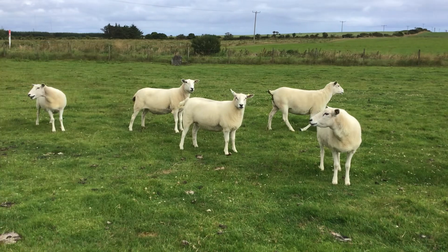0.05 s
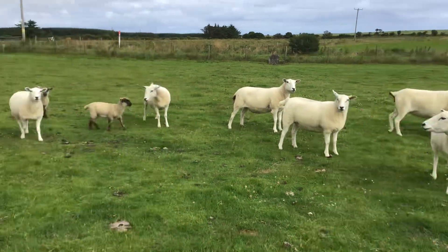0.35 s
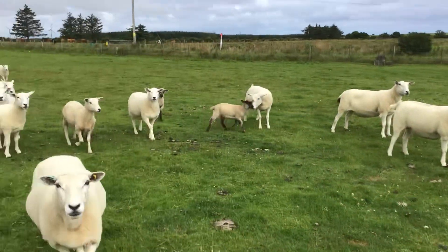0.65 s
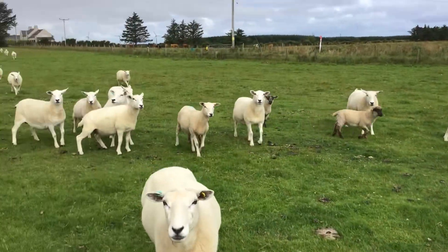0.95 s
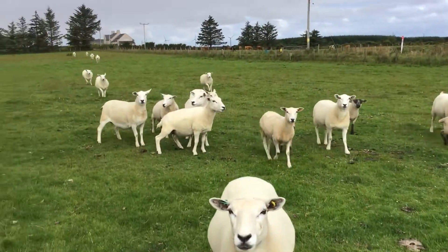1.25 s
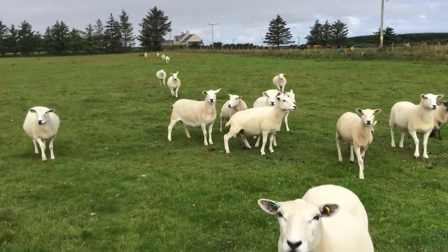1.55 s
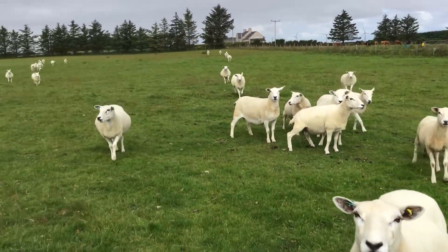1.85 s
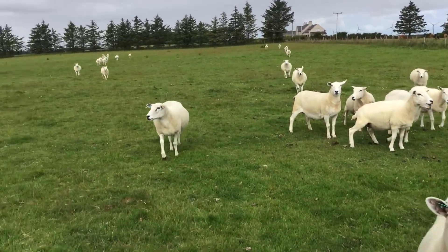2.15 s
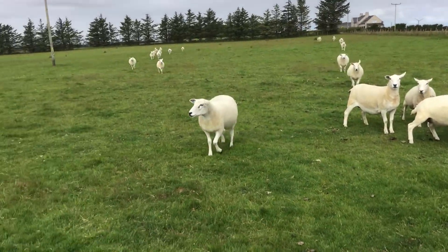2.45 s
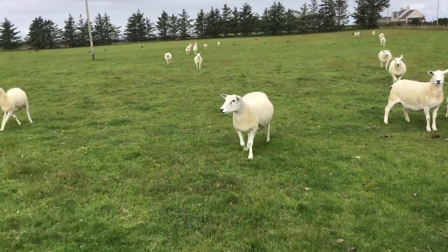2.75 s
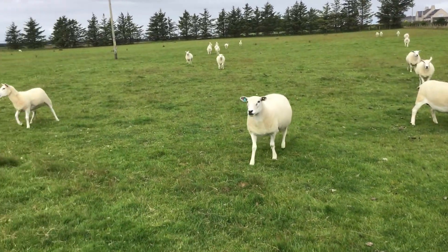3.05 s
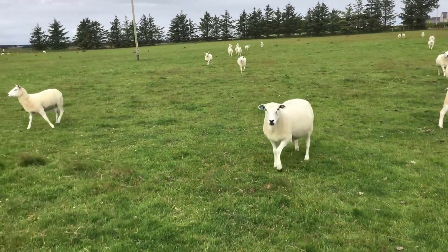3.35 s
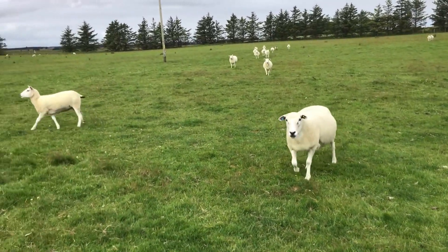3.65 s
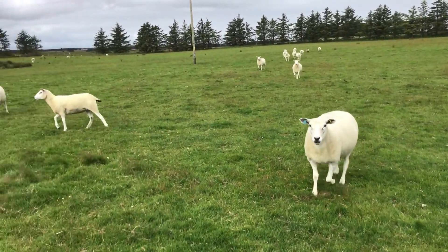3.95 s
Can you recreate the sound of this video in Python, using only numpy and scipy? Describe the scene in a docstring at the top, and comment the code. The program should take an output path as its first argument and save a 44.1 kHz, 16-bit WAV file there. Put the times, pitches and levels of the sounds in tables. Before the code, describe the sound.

Several sheep call in a field: faint bleats first, then a quavering one, a creaky stutter, a throbbing call and a low bleat. Wind bumps the microphone, building to loud, crackling gusts toward the end.

```python
"""An open pasture, where sheep bleat in turn: smooth quavering calls, a creaky stutter, a throbbing call
and a low one. Each bleat is a train of tiny puffs from the vocal folds that makes the throat ring.
Behind them the field hisses faintly and wind rumbles on the microphone. Its eddies (swirls of air) thump
with a falling pitch, and the hardest crackle. A few faint clicks are heard; a limiter holds the peaks."""
import sys
import numpy as np
from scipy import signal
from scipy.fft import rfft, irfft
from scipy.io import wavfile
from scipy.ndimage import uniform_filter1d, minimum_filter1d

SR = 44100
rng = np.random.default_rng(int(sys.argv[2]) if len(sys.argv) > 2 else 0)


def materialize(psi):
    """Save the field psi as 16-bit PCM at rate SR to the path in sys.argv[1].

    A 1-D psi becomes a single channel; in a 2-D psi each row is a channel.
    """
    bounded = np.clip(np.atleast_2d(psi).T, -1, 1)
    quanta = np.round(bounded * 32767).astype(np.int16)
    wavfile.write(sys.argv[1], SR, quanta)


N = 176400  # 4 seconds


def undb(db):
    """Turn decibels into a number to multiply by."""
    return 10 ** (np.asarray(db) / 20)


def unit(x):
    """Scale a signal to a typical size (rms) of 1."""
    return x / np.std(x)


def curve(rows, column=1):
    """One column of a table, joined by straight lines in time."""
    rows = np.array(rows)
    return np.interp(np.arange(N) / SR, rows[:, 0], rows[:, column])


def shape(x, gain_at):
    """Give each frequency its own gain, with a filter that rings only after a sound, never before."""
    hz = np.maximum(np.arange(N + 1) * SR / (2 * N), 1)
    cepstrum = irfft(np.log(gain_at(hz) + 1e-7))
    cepstrum[1:N] *= 2
    cepstrum[N + 1:] = 0
    return irfft(rfft(x, 2 * N) * np.exp(rfft(cepstrum)))[:N]


def noise(colour):
    """Noise of size 1; its colour table says how strong the low and high frequencies are."""
    hz, db = np.array(colour).T
    return unit(shape(rng.standard_normal(N), lambda f: undb(np.interp(np.log(f), np.log(hz), db))))


def wander(per_s):
    """A smooth random wobble of size 1, heading for a new value per_s times a second."""
    k = int(SR / per_s)
    steps = np.repeat(rng.standard_normal(N // k + 1), k)
    return unit(uniform_filter1d(uniform_filter1d(steps, k), k // 2)[:N])


def swell(start, rise_s):
    """A loudness shape that peaks rise_s seconds after its start and dies away."""
    age = np.maximum(np.arange(N) / SR - start, 0) / rise_s
    return age ** 2 * np.exp(2 * (1 - age))


# colour of the field's hiss (frequency [Hz], level [dB])
AIR_COLOUR = [(100, 2), (600, -6), (1200, -9), (2500, -11), (4000, -22.5), (7000, -28), (15000, -27)]

def air(level_db=-53):
    """The faint, nearly steady hiss of the open field."""
    waver = undb(1.1 * wander(14))
    return undb(level_db) * waver * noise(AIR_COLOUR)


# faint clicks, then the bright snap of the hardest wind crack (time [s], level [dB])
CLICKS = [(0.256, -38.5), (0.807, -49), (1.125, -44), (2.268, -41), (2.925, -15)]
# their bright colour (frequency [Hz], level [dB])
CLICK_COLOUR = [(500, -21), (2200, 14), (5500, 9.5), (10000, -3.5), (15000, -20)]

def clicks(rise_s=0.00053):
    """Tiny bursts of bright noise: faint clicks, plus the snap of the hardest wind crack."""
    return noise(CLICK_COLOUR) * sum(undb(db) * swell(start, rise_s) for start, db in CLICKS)


# how strong the wind is (time [s], level [dB])
GUST = [(0, -35.5), (.17, -42.5), (.26, -59.5), (.8, -49.5), (.93, -54.5), (1.05, -44), (1.3, -49),
        (1.75, -42.5), (1.92, -33), (2.04, -52.5), (2.32, -38), (2.45, -52), (2.57, -43), (2.68, -28),
        (2.88, -20.5), (3.02, -31.5), (3.24, -24), (3.3, -33.5), (3.58, -28.5), (3.68, -19), (3.77, -31),
        (3.86, -23.5), (4, -40)]
# colours of the deep rumble and the higher flutter (frequency [Hz], level [dB])
RUMBLE_COLOUR = [(20, -36.5), (38, -18), (62, 0), (100, 0.5), (160, -4), (250, -12.5), (500, -32),
                 (1000, -80.5)]
FLUTTER_COLOUR = [(60, -14), (150, -15.5), (260, 0.5), (480, -2), (800, -17.5), (1500, -36.5),
                  (3000, -52.5), (15000, -105)]

def wind(rumble_flicker_db=3.0, flutter_flicker_db=4):
    """Rough air on the microphone: rumble and flutter surge together; flutter grows faster in a gust."""
    surge, gust_db = wander(45), curve(GUST)
    rumble = unit(noise(RUMBLE_COLOUR) * undb(rumble_flicker_db * surge))
    flutter = unit(noise(FLUTTER_COLOUR) * undb(flutter_flicker_db * surge))
    return rumble * undb(0.47 * gust_db - 0.5) + flutter * undb(gust_db + 6.5)


# eddies that thump (time [s], level [dB])
THUMPS = [(0.086, -10.5), (0.126, -13.5), (0.165, -8), (0.384, -8.5), (0.533, -9.5), (0.67, -10),
          (.778, -12), (0.828, -9.5), (1.002, -7), (1.05, -10.5), (1.119, -14), (1.386, -11.5), (1.497, -6),
          (1.53, -8), (1.696, -4.5), (1.835, 1.5), (1.882, -13), (1.921, -13), (2.132, -6.5), (2.267, -3),
          (2.321, -8.5), (2.598, -6), (2.67, -8), (2.695, -5), (2.733, -9), (2.787, -5.5), (2.809, 1),
          (2.88, -8.5), (2.928, 0.5), (2.97, -12.5), (3.099, -3), (3.179, -0.5), (3.215, 2.5), (3.237, 2.5),
          (3.253, -5.5), (3.358, 0), (3.391, -0.5), (3.426, -4.5), (3.524, -11), (3.556, -1.5), (3.637, 1),
          (3.699, -4.5), (3.719, -7), (3.845, -3.5), (3.917, -7)]
# colour of their slap (frequency [Hz], level [dB])
SLAP_COLOUR = [(80, -7.5), (300, -4), (600, 1), (1000, -12), (2000, -35.5), (12000, -85)]

def eddy_thumps(usual_gust_db=-28, usual_drop_hz=482.7, end_hz=78.2, fall_s=0.00504):
    """Each eddy slaps the microphone's opening and makes a thump that quickly falls in pitch."""
    t, out, slap = np.arange(N) / SR, np.zeros(N), noise(SLAP_COLOUR)
    for (start, db), phase in zip(THUMPS, rng.random(len(THUMPS))):
        age = np.maximum(t - start, 0)
        # in a stronger gust the thump starts higher and the slap is louder
        force_db = np.interp(start, *np.array(GUST).T) - usual_gust_db
        drop_hz = usual_drop_hz * 2 ** (0.06 * force_db)
        cycles = end_hz * age + drop_hz * fall_s * (1 - np.exp(-age / fall_s))
        out += undb(db - 1.5) * swell(start, rise_s=0.0064) * np.sin(2 * np.pi * (cycles + phase))
        out += undb(db - 15 + 1.64 * force_db) * swell(start, rise_s=0.0054) * slap
    return out


# eddies that crackle (time [s], level [dB])
CRACKS = [(1.883, -33), (2.734, -31), (2.785, -19.5), (2.807, -9), (2.876, -13.5), (2.887, -16),
          (2.925, -6.5), (3.215, -14), (3.234, -21.5), (3.261, -22), (3.425, -25.5), (3.491, -28),
          (3.625, -31.5), (3.639, -17.5), (3.657, -33.5), (3.687, -17.5), (3.715, -29), (3.699, -13.5),
          (3.783, -28), (3.82, -25), (3.843, -19.5), (3.852, -22), (3.915, -25.5)]
# colour of the crackle (frequency [Hz], level [dB])
CRACK_COLOUR = [(200, -6), (700, 10), (1600, 3), (3000, -11.5), (5000, -30), (9000, -58.5), (15000, -70)]

def eddy_crackle(rise_s=0.0026):
    """The hardest eddies hit the microphone as short, sharp bursts of noise."""
    return noise(CRACK_COLOUR) * sum(undb(db) * swell(start, rise_s) for start, db in CRACKS)


def voice(hz, throat, jitter, shimmer_db, rasp):
    """Vocal-fold pulses ring the throat. Jitter shakes their pitch, shimmer their size; rasp is breath."""
    def throat_gain(f):
        return sum(undb(db) / (1 + ((f - centre) / (width / 2)) ** 2) ** 1.5
                   for centre, width, db in throat)

    cycles = np.cumsum(hz * (1 + jitter * wander(200))) / SR
    at = np.flatnonzero(np.diff(np.floor(cycles[:-20])) > 0)  # one pulse per cycle
    late = (np.ceil(cycles[at]) - cycles[at]) / (cycles[at + 1] - cycles[at])
    size, pulses = undb(shimmer_db * rng.standard_normal(N))[at], np.zeros(N)
    for k in np.arange(-10, 10):  # spread each pulse so it can land between two samples
        pulses[at + k] += size * np.sinc(k - late) * np.cos(np.pi * (k - late) / 20) ** 2
    breath = unit(np.exp(-(cycles % 1) / 0.12) * rng.standard_normal(N))  # a puff in each cycle
    sound = shape(unit(pulses) + rasp * breath, throat_gain)
    bright_band = signal.sosfilt(signal.butter(2, [1900, 3600], 'band', fs=SR, output='sos'), sound)
    return sound / np.std(bright_band)  # every voice is equally strong in this band


def smooth_call(rows, throat, quaver_percent, jitter, shimmer_db, rasp):
    """One unbroken bleat: pitch and level quaver together, and the opening mouth makes it brighter."""
    quaver_hz, crest_s, quaver_fade_s = 12.6, 1.144, .27
    edge_s, closed_mouth_hz = 0.0044, 2900
    t, start, end = np.arange(N) / SR, rows[0][0], rows[-1][0]
    gate = np.clip(1 + np.minimum(t - start, end - t) / edge_s, 0, 1)
    depth = quaver_percent / np.hypot(1, (t - start) / quaver_fade_s)
    quaver = depth * np.cos(2 * np.pi * quaver_hz * (t - crest_s))
    db = curve(rows, column=2) + .6 * quaver
    bright = voice(curve(rows) * (1 + quaver / 100), throat, jitter, shimmer_db, rasp)
    dull = signal.sosfiltfilt(signal.butter(2, closed_mouth_hz, fs=SR, output='sos'), bright)
    opening = undb(0.4 * (db - np.max(db[gate > 0])))  # wide open at the loudest moment
    return gate * undb(db - 2) * (dull + opening * (bright - dull))


# the course of each smooth bleat (time [s], pitch [Hz], level [dB])
FIRST_CALL = [(0, 198, -40), (.12, 188, -51), (.19, 176, -68)]
FAR_CALL = [(.46, 141.4, -66), (.6, 155.1, -55), (.75, 156.6, -65.5), (.83, 167.7, -57), (.95, 142, -61)]
QUAVER_CALL = [(.955, 194, -48.5), (1.06, 193.2, -44), (1.15, 196.6, -40), (1.24, 195, -40.5),
               (1.36, 194.7, -44), (1.48, 191.5, -49), (1.545, 181.8, -54)]
SHORT_CALL = [(1.9, 187.5, -57), (1.97, 185.4, -45), (2.0, 196.8, -36), (2.025, 194, -38),
              (2.09, 191.2, -42.5), (2.14, 191, -39.5)]
LOW_CALL = [(3.0, 124.9, -42), (3.05, 134.2, -42), (3.16, 138.5, -40.5), (3.225, 148.2, -41.5),
            (3.3, 144.7, -46.5), (3.4, 143.5, -45), (3.45, 139.6, -41.5)]
# where each throat rings (frequency [Hz], width [Hz], level [dB])
SHORT_THROAT = [(600, 320, -3), (1350, 370, -5), (2315, 660, 0), (2830, 330, -2), (4200, 2700, -22.5),
                (6250, 1100, -30.5)]
QUAVER_THROAT = [(766, 400, 5), (1394, 430, -2.5), (2210, 430, 3), (2690, 500, -5), (3260, 480, -10.5),
                 (5100, 360, -20.5)]
LOW_THROAT = [(600, 450, 8), (1410, 480, 3.5), (2305, 560, 5), (2800, 1000, -6.5), (3900, 280, -15.5),
              (5040, 470, -15), (6300, 900, -27)]

def smooth_bleats():
    """Five unbroken bleats from three throats: breathy, far away, quavering, short and low."""
    out = smooth_call(FIRST_CALL, SHORT_THROAT, quaver_percent=.27, jitter=.025, shimmer_db=3, rasp=1)
    out += smooth_call(FAR_CALL, QUAVER_THROAT, quaver_percent=3.8, jitter=.015, shimmer_db=3, rasp=.24)
    out += smooth_call(QUAVER_CALL, QUAVER_THROAT,
                       quaver_percent=3.2, jitter=.006, shimmer_db=1, rasp=.32)
    out += smooth_call(SHORT_CALL, SHORT_THROAT,
                       quaver_percent=1.1, jitter=.009, shimmer_db=1.3, rasp=.45)
    out += smooth_call(LOW_CALL, LOW_THROAT, quaver_percent=1.2, jitter=.012, shimmer_db=1.4, rasp=.35)
    return out


def broken_call(rows, throat, gain_db, jitter, shimmer_db, rasp):
    """Bleating in short bursts; in each the pitch arches up, then sags below where it began."""
    attack_s, release_s, arch, sag = 0.011, .018, .16, .06
    t = np.arange(N) / SR
    hz, loudness = np.full(N, float(rows[0][2])), np.zeros(N)
    for start, length, pitch, db in rows:
        place = np.clip(2 * (t - start) / length - 1, -1, 1)  # -1 at the burst's start, 1 at its end
        hz = np.where(t > start, pitch * (1 - arch * place ** 2 - sag * place), hz)
        gate = np.clip(np.minimum((t - start) / attack_s, (start + length - t) / release_s), 0, 1)
        loudness += undb(db + gain_db) * gate
    return loudness * voice(hz, throat, jitter, shimmer_db, rasp)


# short, creaky bursts of voice (time [s], length [s], pitch [Hz], level [dB])
STUTTER = [(2.04, .055, 100.1, -44), (2.103, .058, 124.1, -39.5), (2.194, .066, 124.2, -42),
           (2.295, .068, 125, -42.5), (2.395, .066, 128.2, -41.5), (2.495, .066, 125.9, -42.5),
           (2.972, .07, 84.9, -43)]
# a soft bleat from another sheep, then the throbs of the high call
# (time [s], length [s], pitch [Hz], level [dB])
SOFT_BLEAT_AND_THROBS = [(2.36, .2, 177.6, -51), (2.57, 0.079, 181.5, -48.5), (2.638, 0.073, 187.2, -40.5),
                         (2.728, .066, 188.3, -40), (2.815, 0.079, 187.4, -37.5), (2.903, .06, 178.5, -40),
                         (2.995, 0.083, 172.3, -47), (3.08, .06, 179, -42)]
# where each throat rings (frequency [Hz], width [Hz], level [dB])
STUTTER_THROAT = [(584, 270, 8.5), (1400, 510, -3.5), (2430, 800, -2), (3106, 430, 0.5), (4600, 850, -19)]
THROB_THROAT = [(720, 440, 6), (1610, 1200, -2), (2530, 480, -1.5), (3053, 420, -1.5), (3690, 346, -9.5),
                (4980, 990, -21.5), (9370, 1900, -27.5)]

def broken_bleats():
    """A low stutter, creaky because its pulses are so uneven; a soft bleat; a high, throbbing call."""
    stutter = broken_call(STUTTER, STUTTER_THROAT, gain_db=0, jitter=.05, shimmer_db=4, rasp=.3)
    return stutter + broken_call(SOFT_BLEAT_AND_THROBS, THROB_THROAT,
                                 gain_db=-0.5, jitter=.01, shimmer_db=1.3, rasp=.3)


def flock(echo_db=-8.5, echo_s=0.12):
    """All the bleats, plus a thin echo scattered by the field that fades by 60 dB in echo_s."""
    bleats = smooth_bleats() + broken_bleats()
    t = np.arange(SR // 2) / SR
    scatter = rng.standard_normal(len(t)) * np.exp(-np.log(1000) * t / echo_s)
    return bleats + undb(echo_db) * signal.fftconvolve(bleats, scatter / np.linalg.norm(scatter))[:N]


def scene():
    """The flock, the wind, the clicks and the open air, mixed into one channel."""
    return (flock() + wind() + eddy_thumps() + eddy_crackle() + clicks() + air())[None]


def record(dry):
    """The microphone drops the deepest bass, a limiter turns down peaks, and the top treble is cut."""
    bass_cut_hz, treble_cut_hz, ceiling, look_ahead_s = 51, 15800, 0.91, 0.0035
    sound = signal.sosfilt(signal.butter(4, bass_cut_hz, 'high', fs=SR, output='sos'), dry)
    k = int(look_ahead_s * SR)
    # the gain eases down just before each peak and back up after it
    needed_gain = minimum_filter1d(ceiling / np.maximum(np.abs(sound), ceiling), 2 * k)
    gain = uniform_filter1d(uniform_filter1d(needed_gain, k), k)
    return signal.sosfilt(signal.ellip(10, .2, 70, treble_cut_hz, fs=SR, output='sos'), sound * gain)


dry = scene()
out = record(dry)
materialize(out)
```